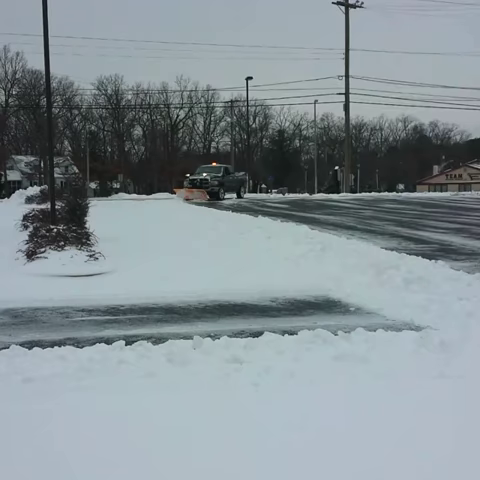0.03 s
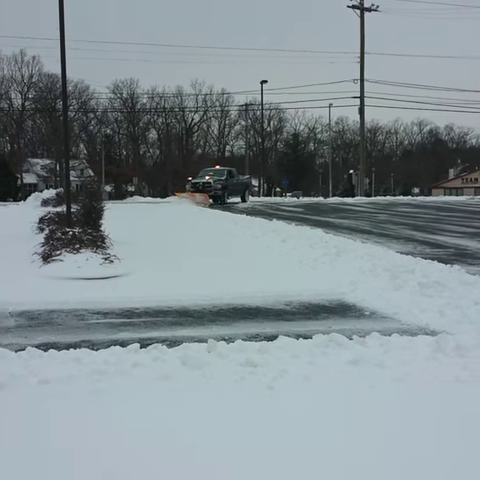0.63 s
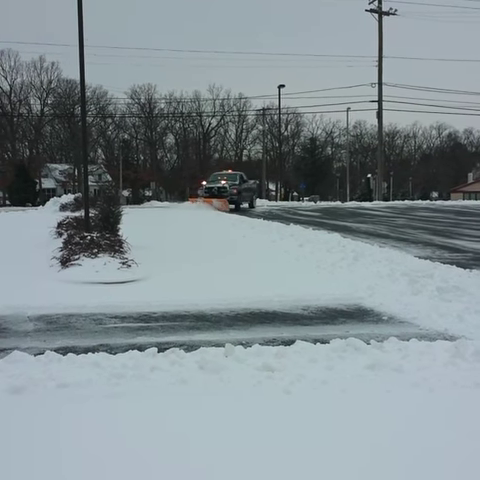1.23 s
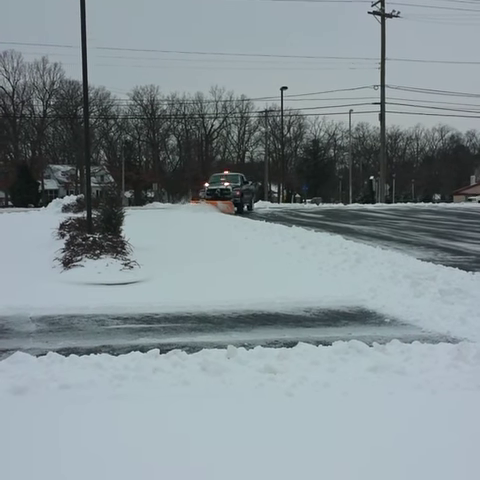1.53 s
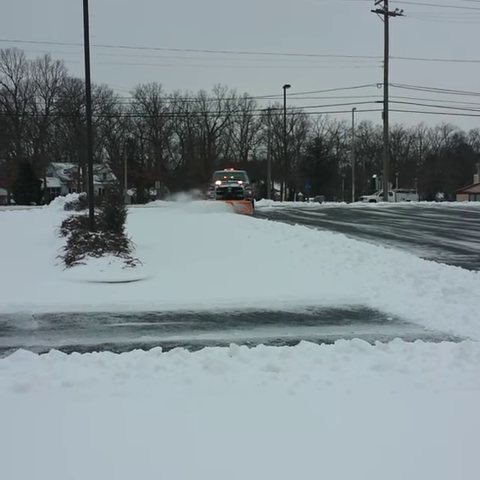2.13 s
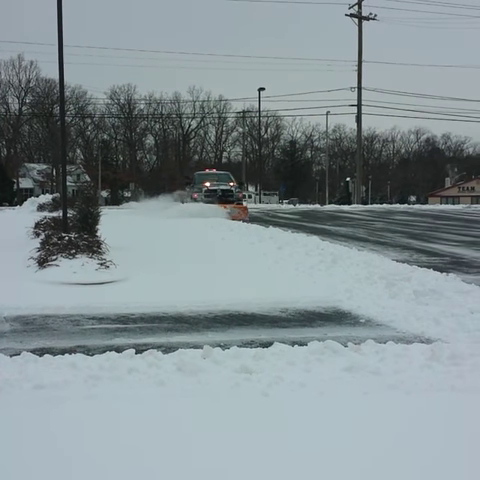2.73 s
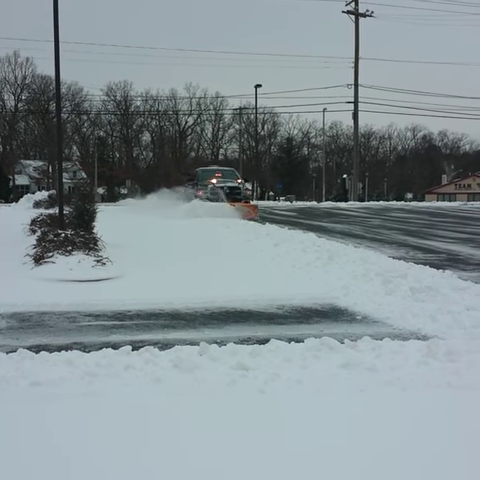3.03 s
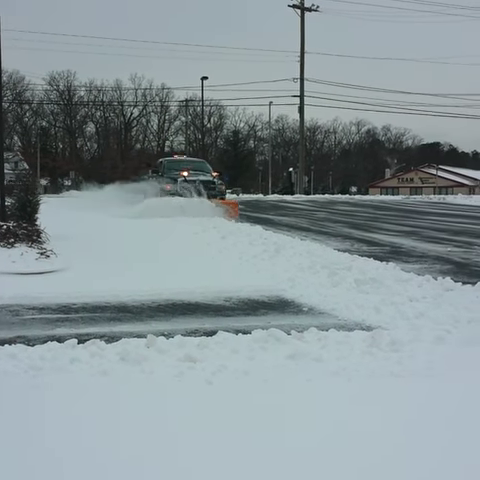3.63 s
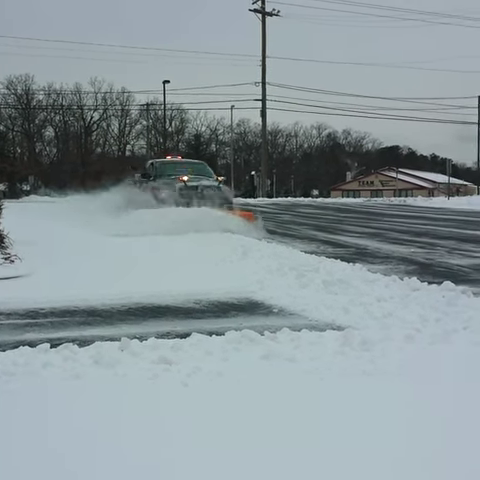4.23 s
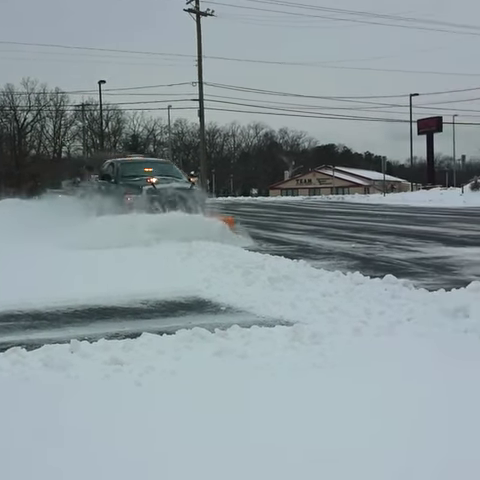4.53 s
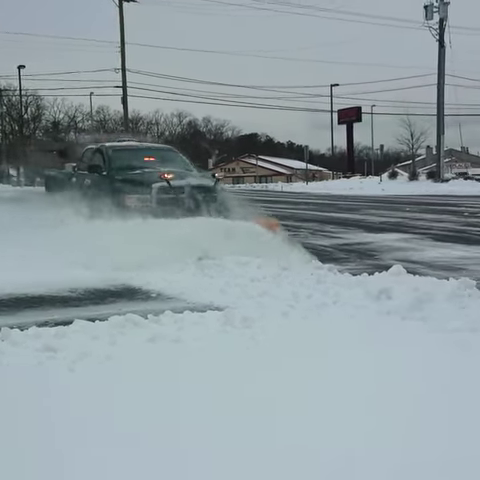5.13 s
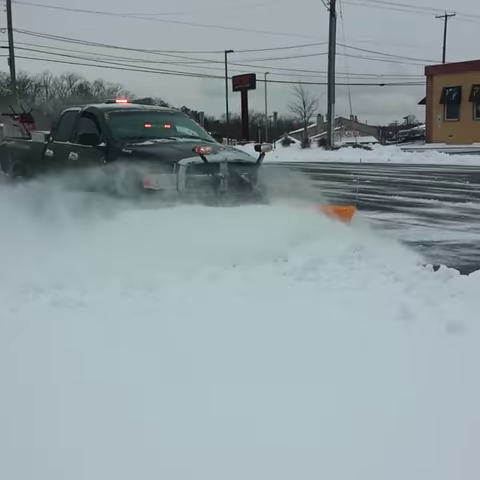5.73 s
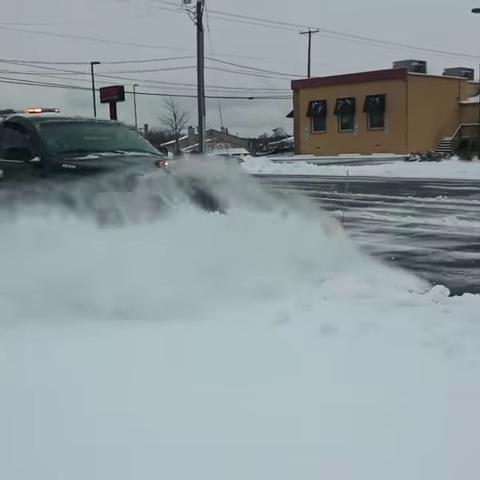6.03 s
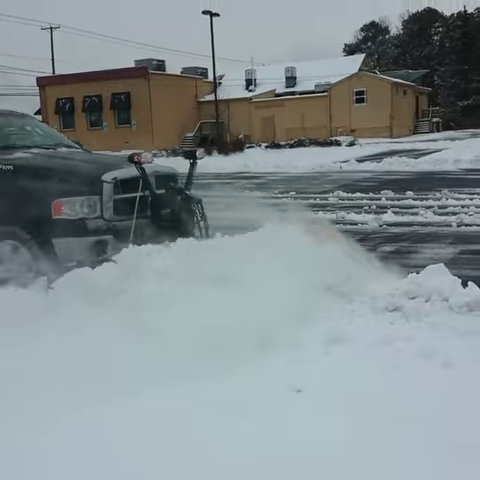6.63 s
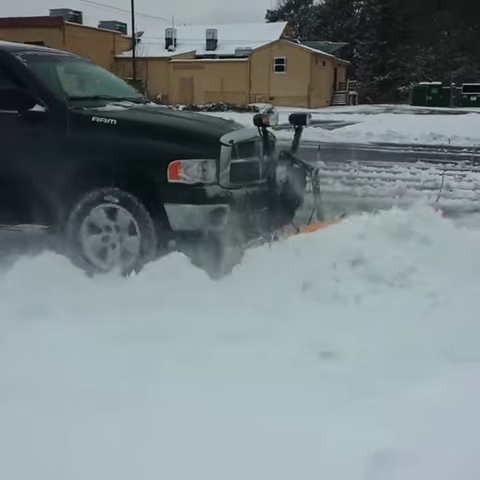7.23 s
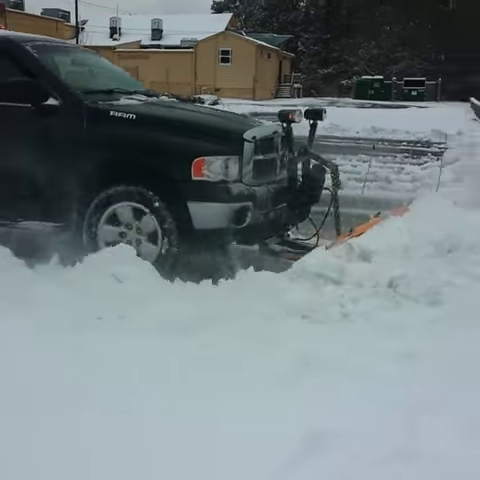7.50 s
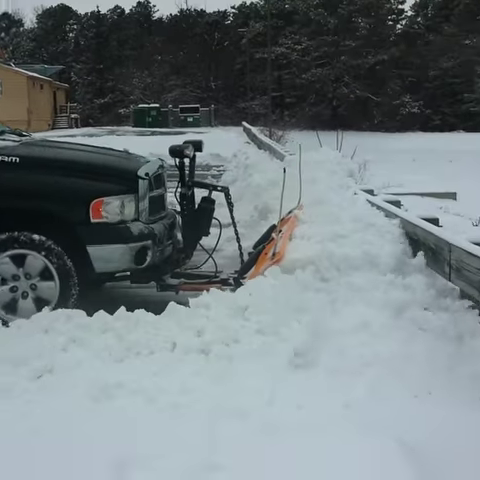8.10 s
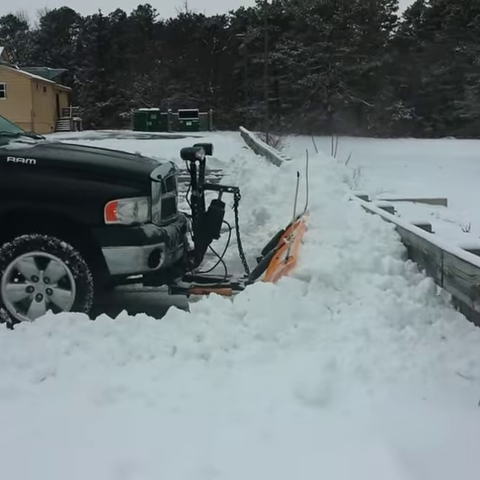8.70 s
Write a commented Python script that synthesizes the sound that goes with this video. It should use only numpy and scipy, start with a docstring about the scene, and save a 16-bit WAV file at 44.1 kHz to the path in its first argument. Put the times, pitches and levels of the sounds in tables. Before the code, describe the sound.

Outdoors in a snowy lot, a plow blade scrapes in swells under the rising rumble of an approaching truck, with light wind and small ticks on the microphone. The driver lifts off about halfway. Then everything grows louder and nearer: the blade knocks and grinds, packed snow crunches and sprays, a pump whines upward and the engine hisses, sinking to a deep drone as it slows.

```python
"""Snow plow in a parking lot

A V8 pickup pulls up through its revs, lifts off, passes close and shoves snow into a bank. Its exhaust
harmonics sweep through the pipe's resonance; friction and impacts excite the steel blade; snow crunches
and sprays. Close by, a drone sinks, a pump whines, and the engine bay's hiss interferes with its ground
reflection while one bright band of it rises. Light wind rumbles; the camera's case clicks a few times."""
import sys
import numpy as np
from scipy import signal
from scipy.fft import rfft, irfft, next_fast_len
from scipy.io import wavfile
from scipy.ndimage import map_coordinates

SR = 44100
rng = np.random.default_rng(int(sys.argv[2]) if len(sys.argv) > 2 else 0)


def to_wav(sig):
    """Store sig (one row per channel, or 1-D mono) as 16-bit WAV at the path in sys.argv[1].

    Samples outside -1..1 are clipped; the rate is SR.
    """
    pcm = np.clip(np.atleast_2d(sig), -1, 1) * 32767
    pcm = np.round(pcm).astype(np.int16)
    wavfile.write(sys.argv[1], SR, pcm.T)  # frames by channels


N = 390726
TIME = np.arange(N) / SR


def amp(db):
    """Amplitude ratio of a level in decibels."""
    return 10 ** (np.asarray(db) / 20)


def unit(x):
    """Normalisation to rms 1."""
    return x / np.sqrt(np.mean(x ** 2) + 1e-20)


def along(points, hz):
    """Interpolation of (f/Hz, value) points on a logarithmic frequency axis."""
    f, values = np.transpose(points)
    return np.interp(np.log(hz + 1), np.log(f + 1), values)


def curves(rows):
    """Linear interpolation in time: one curve for each column after t/s."""
    times, *columns = np.transpose(rows)
    return [np.interp(TIME, times, column) for column in columns]


def sounding(rows):
    """Rectangular window over the time span of a table."""
    return (TIME > rows[0][0]) & (TIME < rows[-1][0])


def wobble(rate):
    """Smooth random modulation: a spline through `rate` Gaussian knots a second."""
    knots = rng.standard_normal(int(N * rate / SR) + 4)
    return map_coordinates(knots, [TIME * rate])


def filtered(x, response):
    """Linear filtering: the spectrum of x times a complex frequency response."""
    size = next_fast_len(N + SR // 2)
    return irfft(rfft(x, size) * response(np.fft.rfftfreq(size, 1 / SR)), size)[..., :N]


def add(track, onset, sound):
    """Superposition of a sound on a track, from an onset in seconds."""
    part = track[..., round(onset * SR):][..., :sound.shape[-1]]
    part += sound[..., :part.shape[-1]]


def tone(hz):
    """Sinusoid of rms 1 whose phase is the integral of a frequency curve."""
    return np.sqrt(2) * np.sin(2 * np.pi * (np.cumsum(hz) / SR + rng.random()))


def narrowband(hz, half_width_hz):
    """Quadrature modulation gives a narrow noise band of rms 1 around a frequency curve."""
    phase = 2 * np.pi * np.cumsum(hz) / SR
    return unit(wobble(2 * half_width_hz) * np.cos(phase) + wobble(2 * half_width_hz) * np.sin(phase))


# Likeness of the left and right channels: f/Hz, coherence
COHERENCE = [(30, 0.88), (130, 1), (280, 0.85), (1000, 0.87), (3000, 0.99), (6000, 0.9), (10000, 0.98),
             (14000, 0.5)]

def rush(spectrum, grain=1):
    """Partly coherent stereo noise of rms 1; grain modulates the excitation before it is coloured."""
    def colour(hz):
        angle = np.arccos(np.clip(along(COHERENCE, hz), -1, 1)) / 2
        return amp(along(spectrum, hz)) * [np.cos(angle), np.sin(angle)]
    mid, side = filtered(grain * rng.standard_normal((2, N)), colour)
    return unit(np.array([mid + side, mid - side]))


# Reference level of the truck, swelling three times from afar, then passing close: t/s, level/dB
TRUCK_LEVEL = [(.45, -56.5), (.7, -47), (1.22, -42.5), (1.8, -49.5), (2.08, -48), (2.34, -42), (2.52, -51),
               (3.0, -54), (3.22, -51), (3.6, -39.5), (3.95, -48.5), (5.1, -50), (6.08, -51), (6.8, -35),
               (7.08, -38.5), (7.75, -34), (7.98, -39), (8.86, -43.5)]
# The truck's approach: t/s, nearness (0 to 1)
NEARNESS = [(0, 0.14), (4.2, 0.01), (5.5, 0.34), (6.6, 0.82), (8.86, 1)]
# Engine cycle rate, which climbs, drops at lift-off and sags against the bank: t/s, f/Hz
CYCLE_RATE = [(.8, 11.8), (1.02, 12.6), (1.2, 13.7), (1.52, 14.55), (2.02, 15.55), (2.47, 16.75),
              (2.98, 17.65), (3.79, 19.1), (4.11, 20.9), (4.36, 21.75), (4.57, 22), (4.76, 16.1),
              (5.0, 14.15), (5.6, 16), (6.1, 16.3), (6.55, 14.92), (7.05, 14), (7.8, 14.3), (8.86, 13.3)]
# Exhaust strength re full throttle: t/s, level/dB
THROTTLE_LEVEL = [(.5, -3.5), (.85, -4.5), (1.2, -0.5), (1.65, 0), (2.3, -0.5), (4.55, -1.5), (5.0, -9.5),
                  (5.25, -20), (5.55, -21), (5.85, -6), (6.58, -6), (6.8, -11), (7.15, -10.5), (7.8, -15.5),
                  (8.75, -0.5)]
# Harmonics of the cycle rate; the V8's uneven banks stress 5 and 8: order, level/dB
EXHAUST_ORDERS = [(3, -8.5), (4, -15), (5, 0.5), (6, -23), (7, -7.5), (8, 1), (9, -19.5), (10, -15.5),
                  (11, -17.5), (12, -22), (13, -12.5), (14, -27), (16, -19)]
# Response of the exhaust pipe: f/Hz, level/dB
PIPE_RESPONSE = [(40, -25), (60, -19), (70, -11), (82, -4), (94, 0), (104, 0), (118, 1), (134, -4.5),
                 (150, -7.5), (175, -6.5), (200, -8.5), (235, -15.5), (290, -5), (400, -41)]
# Spectrum of the exhaust's turbulence: f/Hz, level/dB
RUMBLE_SPECTRUM = [(35, -44), (62, -1), (85, 4), (110, 4), (135, 2), (160, -9.5), (195, 0), (250, -21),
                   (400, -19), (900, -67)]

def engine():
    """Forced resonance: each exhaust harmonic swells as the revs carry it through a peak of the pipe."""
    cycle_hz, = curves(CYCLE_RATE)
    truck_db, = curves(TRUCK_LEVEL)
    throttle_db, = curves(THROTTLE_LEVEL)
    near, = curves(NEARNESS)
    cycle_hz *= 1 + (0.002 + 0.024 * near) * wobble(24)
    lope_below_hz = 16.5
    slowness = np.clip((lope_below_hz - cycle_hz) / (lope_below_hz - cycle_hz.min()), 0, 1)
    boost_db = {5: 11 * np.exp(-((TIME - 7.8) / 0.32) ** 2),  # booms, labouring against the bank
                9: 17 * slowness ** 2}  # beats with the firing order, so the engine lopes
    harmonics = np.zeros(N)
    for order, db in EXHAUST_ORDERS:
        hz = order * cycle_hz
        waver_db = (0.9 + 2.4 * near) * wobble(12)
        harmonics += amp(db + boost_db.get(order, 0) + along(PIPE_RESPONSE, hz) + waver_db) * tone(hz)
    throb = 1 + 0.35 * tone(cycle_hz)
    rumble = amp(4.5 + 4.2 * near) * unit(throb * rush(RUMBLE_SPECTRUM))
    return amp(truck_db) * (amp(15.5 + throttle_db) * harmonics + rumble)


# Spectra of the scrape from afar and close by: f/Hz, level/dB
FAR_SPECTRUM = [(120, -56), (250, 1.5), (400, -5.5), (540, -2.5), (620, 0.5), (730, -0.5), (900, -4.5),
                (1150, -5), (1400, -14), (2200, -20), (5000, -67)]
CLOSE_SPECTRUM = [(120, -42), (240, 1.5), (400, 3), (520, -5.5), (700, 3), (900, -2.5), (1200, -3.5),
                  (1600, -14), (2400, -20), (5000, -67)]
# Modes of the dragged blade, heard from afar: f/Hz, half-width/Hz, level/dB
STEEL_MODES = [(535, 26, -6), (737, 28, -7.5)]

def scrape():
    """Friction noise: the edge judders over asphalt and excites the blade's modes; coarser close by."""
    truck_db, = curves(TRUCK_LEVEL)
    near, = curves(NEARNESS)
    cycle_hz, = curves(CYCLE_RATE)
    shake_db = 0.3 * tone(cycle_hz)  # the engine shakes the blade
    far = rush(FAR_SPECTRUM, grain=amp(shake_db + 1.86 * wobble(70)))
    close = rush(CLOSE_SPECTRUM, grain=amp(1.7 * wobble(110) + 1.1 * wobble(25)))
    friction = np.sqrt(1 - near) * far + np.sqrt(near) * close
    steel = sum(amp(db) * narrowband(hz * (1 + 0.02 * wobble(3)), half_width)
                for hz, half_width, db in STEEL_MODES)
    return amp(truck_db) * (amp(3) * friction + (1 - near) * steel)


# Spectra of crumbling grains and of breaking slabs: f/Hz, level/dB
GRAIN_SPECTRUM = [(600, -17), (1300, 2), (1650, 2), (1950, 3.5), (2700, 4), (3800, 1.5), (4700, 0.5),
                  (5300, -8), (7000, -3), (12000, -39)]
SLAB_SPECTRUM = [(600, 7), (1400, 5.5), (1680, -3), (2000, 5), (2600, 1.5), (3250, 6), (3700, 3),
                 (4250, 4.5), (5200, -1.5), (7000, 1.5), (8000, -4), (9500, -1), (14000, -30)]
# Breaks in the packed snow: t/s, level/dB
SLAB_BREAKS = [(4.73, -46), (4.79, -52), (5.035, -50), (5.172, -44.5), (5.32, -52), (6.45, -39.5),
               (6.812, -35.5), (7.0, -35), (7.401, -34), (7.713, -30.5), (7.765, -35), (7.829, -28),
               (8.403, -35.5), (8.53, -39), (8.582, -32), (8.755, -38)]

def snow_crunch():
    """Fracture noise: fine grains crumble continuously before the blade, and slabs break in bursts."""
    truck_db, = curves(TRUCK_LEVEL)
    bursts, t = np.zeros(N), np.arange(SR // 4) / SR
    for onset, db in SLAB_BREAKS:
        add(bursts, onset, amp(db) * t / 0.0073 * np.exp(1 - t / 0.0099))
    grains = rush(GRAIN_SPECTRUM, grain=amp(0.73 * wobble(900) + 0.94 * wobble(60)))
    slabs = rush(SLAB_SPECTRUM, grain=amp(2.3 * wobble(1200)))
    return amp(truck_db - 3) * grains + bursts * slabs


# Spectrum of flying snow: f/Hz, level/dB
SPRAY_SPECTRUM = [(2500, -11), (4600, -5), (5100, -10), (5500, -8.5), (5900, 4), (6350, 4.5), (7100, -2.5),
                  (9000, -0.5), (10500, -5), (12500, -13.5), (14500, -31), (16000, -73)]

def snow_spray():
    """Broadband noise: spraying snow hisses with a fine grain, following the truck's level."""
    truck_db, = curves(TRUCK_LEVEL)
    return amp(truck_db - 5) * rush(SPRAY_SPECTRUM, grain=amp(0.99 * wobble(1000)))


# Spectrum of wind on the microphone: f/Hz, level/dB
WIND_SPECTRUM = [(15, -13), (30, -7), (42, 15), (56, -22), (90, -32), (200, -51)]

def wind():
    """Turbulent pressure at the microphone: a low rumble that rises and falls with the truck's sound."""
    truck_db, = curves(TRUCK_LEVEL)
    near, = curves(NEARNESS)
    gust_db = 2.2 * wobble(6.8)
    return amp(truck_db - 10 - 4 * near + gust_db) * rush(WIND_SPECTRUM)


# The edge digs in: t/s, duration/s, centre f/Hz, level/dB
BITES = [(1.12, 0.14, 680, -42), (3.4, 0.73, 600, -48.5), (3.3, 0.67, 1670, -50.5),
         (3.4, 0.63, 2400, -53.5), (4.62, 0.21, 670, -44.5), (4.95, 0.125, 670, -46),
         (4.701, 0.43, 1270, -50), (4.7, 0.14, 2000, -54), (5.286, 0.098, 1210, -49.5),
         (6.73, 0.194, 700, -31.5), (6.78, 0.133, 380, -32.5), (6.75, 0.23, 1010, -38),
         (7.119, 0.11, 680, -30.5), (7.151, 0.186, 570, -34), (7.281, 0.154, 590, -30),
         (7.415, 0.15, 450, -30.5), (7.607, 0.02, 1050, -28), (7.63, 0.02, 1110, -26.5),
         (7.671, 0.114, 764, -33.5)]

def grinding():
    """Resonant filtering: where the edge bites, rough friction noise gathers around one resonance."""
    out = np.zeros(N)
    judder = amp(2.2 * wobble(80))
    for onset, duration, hz, db in BITES:
        count = int(duration * SR)
        friction = rng.standard_normal(count) * judder[round(onset * SR):][:count]
        band = signal.butter(2, [hz / 1.25, hz * 1.25], "band", fs=SR, output="sos")
        grind = unit(signal.sosfilt(band, friction))
        add(out, onset, amp(db) * signal.windows.tukey(count, 0.5) * grind)
    return out


# Modes of the camera's case (knock, low snap, high snap, ring): f/Hz, T60/s
CASE_MODES = [(1050, 0.0082), (2500, 0.0028), (4000, 0.003), (6500, 0.0016)]
# Clicks: t/s, knock level/dB, snap level/dB, ring level/dB, left-right difference of snap and ring/dB
CASE_CLICKS = [(1.3372, -10, -0.5, -2.5, 14), (2.3770, -21, -5, 3, 11), (3.4539, -11, -3, -9.5, 15),
               (3.7040, -24, -3, 3, 15), (4.4923, -16, -3.5, -5.5, 14), (5.2079, -13, -2, -2, 10.5),
               (5.4318, -19, -13, -1.5, 6.5)]

def clicks():
    """Damped free vibration: the camera's case ticks thinly beside the left microphone port."""
    out, t = np.zeros((2, N)), np.arange(SR // 50) / SR
    highpass = signal.butter(2, 800, "high", fs=SR, output="sos")
    knock, low, high, ring = [amp(-60 * t / t60) * np.sin(2 * np.pi * hz * t) for hz, t60 in CASE_MODES]
    for onset, knock_db, snap_db, ring_db, pan_db in CASE_CLICKS:
        snap = amp(snap_db) * (low - high) + amp(ring_db) * ring
        snap += 0.25 * np.interp(t - 0.00063, t, snap, left=0)  # one reflection across the case
        loose_parts = amp(-60 * t / 0.012) * rng.standard_normal(len(t))
        snap += 0.045 * np.convolve(snap, loose_parts)[:len(t)]  # a brief buzz of the same colour
        body = amp(knock_db) * knock
        add(out, onset, signal.sosfilt(highpass, [snap - 0.097 * body, amp(-pan_db) * snap - body]))
    return out


# The blade catches and sings: t/s, duration/s, starting f/Hz, level/dB
CATCHES = [(1.4, 0.48, 522, -48), (1.851, 0.79, 707, -44), (2.85, 1, 461, -50), (3.2, 0.98, 517, -44.5),
           (3.477, 0.36, 682, -44)]

def squeals():
    """Friction-excited resonance: one blade mode swells and fades, rising as the truck gathers speed."""
    out, rise_per_s = np.zeros(N), 0.08
    for onset, duration, hz, db in CATCHES:
        count = int(duration * SR)
        mode = narrowband(hz * (1 + rise_per_s * TIME), half_width_hz=20)
        add(out, onset, amp(db) * np.hanning(count) * mode[:count])
    return out


# Hiss of the engine bay, swelling as the nose goes by: t/s, level/dB
BAY_LEVEL = [(4.6, -62), (5.4, -51), (6.1, -52), (6.6, -42.5), (6.95, -37), (7.15, -35), (7.7, -34.5),
             (8.0, -35), (8.22, -35.5), (8.4, -38.5), (8.65, -44), (8.86, -55)]
# Its spectrum: f/Hz, level/dB
BAY_SPECTRUM = [(2500, -13), (4000, -7), (4700, -1.5), (5250, -4), (5900, 2), (6450, 4), (7200, -1.5),
                (9000, 0), (10500, -3.5), (12500, -12), (14500, -30), (16000, -73)]
# Its reflection off the scraped ground: t/s, delay/ms, relative amplitude
GROUND_REFLECTION = [(6.85, 1.6, 0), (7.0, 1.44, .5), (7.12, 1.29, .85), (7.3, 1.265, .85),
                     (7.46, 1.22, .8), (7.6, 1.15, .7), (7.85, 1.1, .55), (7.96, 1.04, .9),
                     (8.1, 1.025, .9), (8.27, 1.02, .7), (8.45, 1, 0)]

def bay_hiss():
    """Comb filtering: hiss interferes with its reflection, and the peaks rise as the delay shortens."""
    bay_db, = curves(BAY_LEVEL)
    delay_ms, strength = curves(GROUND_REFLECTION)
    direct = rush(BAY_SPECTRUM, grain=amp(1.1 * wobble(1000) + wobble(70)))
    delay_ms *= 1 + 0.008 * wobble(14)  # uneven ground
    earlier = np.arange(N) - delay_ms * SR / 1000
    reflected = np.array([map_coordinates(channel, [earlier]) for channel in direct])
    # rough snow scatters the highest frequencies
    reflected = filtered(reflected, lambda hz: 1 / (1 + (hz / 12000) ** 12))
    return amp(bay_db) * (direct + strength * reflected) / np.hypot(1, strength)


# Modes of the plow's steel frame: f/Hz, bandwidth/Hz, level/dB
FRAME_MODES = [(423, 530, -6.5), (770, 160, 1.5), (1130, 210, -5.5), (2090, 610, -15)]
# The blade hits ice and lumps: t/s, level/dB, thud offset/dB, clunk f/Hz
IMPACTS = [(5.035, -24, -30, 650), (5.11, -22.5, -1, 830), (5.176, -24.5, -4, 900), (5.67, -27.5, -13, 765),
           (6.073, -36, 13.5, 328), (6.581, -12.5, -17, 758), (6.686, -15, -22, 676),
           (6.731, -21, -12, 331), (6.777, -13, -16, 800), (6.85, -10.5, -6, 850), (6.891, -14, -2, 780),
           (7.146, -14, -16, 710), (7.2, -19, -14, 560), (7.319, -19, -18, 620), (7.413, -15, -17, 800),
           (7.668, -18, -14, 720), (7.84, -4.5, -13, 734), (8.58, -14.5, -3, 1200)]

def knocks():
    """Impact excitation: lumps give a steel rattle, a clunk pitched by where they strike, and a thud."""
    def frame_response(f):
        modes = sum((-1) ** k * amp(db) * 1j * f * width / (hz ** 2 - f ** 2 + 1j * f * width)
                    for k, (hz, width, db) in enumerate(FRAME_MODES))
        return modes / (1 + 1j * f / 3000)
    rattle, clunk, thud = np.zeros((3, N))
    t = np.arange(SR // 5) / SR
    attack_s, t60_s = 0.0019, 0.051
    envelope = amp(-60 * t / t60_s) * (1 - np.exp(-t / attack_s))
    for onset, db, thud_db, hz in IMPACTS:
        add(rattle, onset, amp(db + 7.5) * envelope * rng.standard_normal(len(t)))
        add(clunk, onset, amp(db - 8) * envelope * np.sin(2 * np.pi * hz * t))
        add(thud, onset, amp(db + thud_db + 14) * envelope * rng.standard_normal(len(t)))
    dull = signal.butter(2, [110, 380], "band", fs=SR, output="sos")
    return filtered(rattle, frame_response) + clunk + signal.sosfilt(dull, thud)


def unsteady_tone(rows, waver, flutter_db):
    """Random amplitude and frequency modulation of a gliding tone; waver is a fraction of its pitch."""
    hz, db = curves(rows)
    envelope = sounding(rows) * amp(db + flutter_db * wobble(40))
    return envelope * tone(hz * (1 + waver * wobble(150)))


# Drone of the drive line: t/s, f/Hz, level/dB
DRIVE_LINE_TONE = [(6.2, 62, -61), (6.6, 58.5, -48), (7.3, 48.7, -46), (8.3, 46.05, -40.5),
                   (8.86, 43.9, -35)]

def drive_line():
    """Rotational vibration: a deep, fluttering drone sinks as the truck slows."""
    return unsteady_tone(DRIVE_LINE_TONE, waver=0.037, flutter_db=6.5)


# Whine of the pump: t/s, f/Hz, level/dB
PUMP_TONE = [(6.6, 635, -42), (7.15, 730, -44.5), (7.28, 735, -36.5), (7.37, 812, -35), (7.65, 863, -46),
             (7.78, 886, -34), (7.88, 919, -39.5), (8.1, 907, -39), (8.34, 918, -39.5), (8.39, 990, -43),
             (8.43, 1030, -72)]

def pump():
    """Periodic pulsation: the pump whines under load, climbing in pitch."""
    return unsteady_tone(PUMP_TONE, waver=0.011, flutter_db=0.5)


# A bright band of the engine bay's hiss: t/s, centre f/Hz, level/dB
HISS_BAND = [(7.05, 4600, -60), (7.15, 4690, -47), (7.33, 4780, -48), (7.47, 5000, -53), (7.6, 5250, -42),
             (7.85, 5520, -39.5), (8.0, 5780, -39), (8.2, 5930, -39.5), (8.35, 6020, -48),
             (8.42, 6050, -62)]

def rising_hiss_band():
    """Narrow-band noise: a bright, fluttering band of the bay's hiss rises from about 4.6 to 6 kHz."""
    hz, db = curves(HISS_BAND)
    core = narrowband(hz, half_width_hz=90)
    skirt = narrowband(hz, half_width_hz=240)
    flutter_db = 1.5 * wobble(70)
    return sounding(HISS_BAND) * amp(db + flutter_db) * unit(core + skirt)


# Imbalance of the two microphone ports: f/Hz, left-right difference/dB
PORT_IMBALANCE = [(30, 2), (500, 0), (1200, 1), (2500, 5), (4500, -1.5), (5500, 14.5), (6300, 15.5),
                  (7200, 3.5), (8500, -5), (10000, -13.5), (15000, -26)]

def port_response(hz):
    """Level difference between channels: each port colours the outdoor sound in its own way."""
    gains = amp(np.array([[0.5], [-0.5]]) * along(PORT_IMBALANCE, hz))
    return gains / gains.mean(axis=0)


def scene():
    """Superposition: the outdoor sources pass through the ports, and the case's clicks add directly."""
    outdoors = engine() + scrape() + snow_crunch() + snow_spray() + wind() + grinding() + squeals()
    outdoors += bay_hiss() + knocks() + drive_line() + pump() + rising_hiss_band()
    return filtered(outdoors, port_response) + clicks()


def record(dry):
    """Gating and band limiting: the sound opens after a silence, is held to full scale and low-passed."""
    start_s, fade_s, cutoff_hz = 0.39, 0.05, 14900
    opening = np.clip((TIME - start_s) / fade_s, 0, 1) ** 2
    return filtered(np.clip(dry * opening, -1, 1), lambda hz: 1 / (1 + (hz / cutoff_hz) ** 120))


dry = scene()
out = record(dry)
to_wav(out)
```